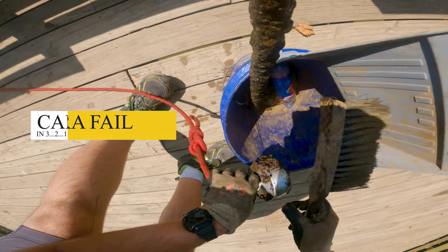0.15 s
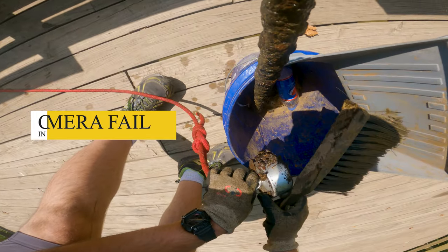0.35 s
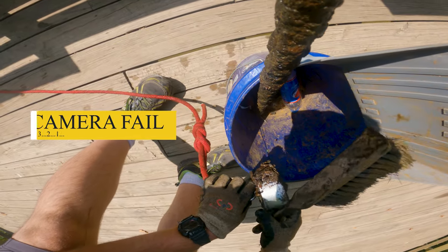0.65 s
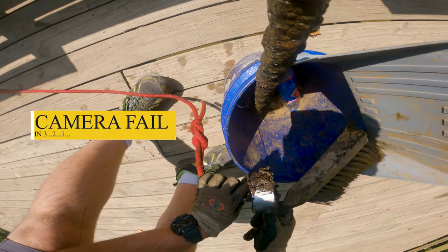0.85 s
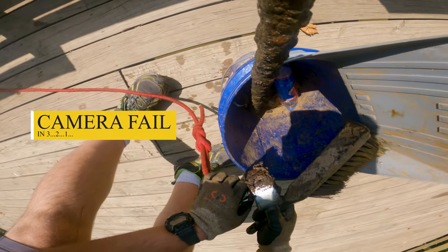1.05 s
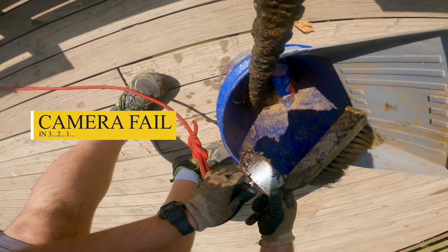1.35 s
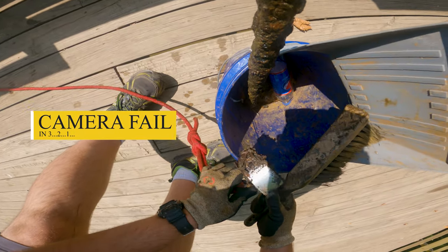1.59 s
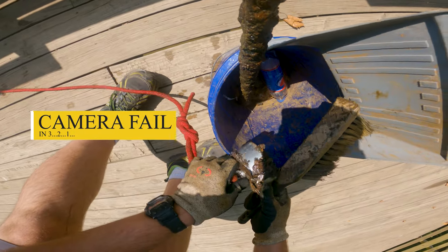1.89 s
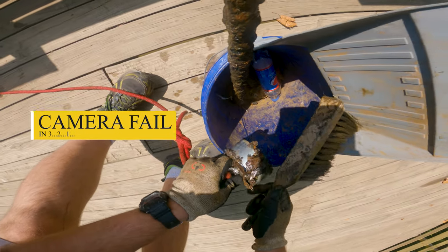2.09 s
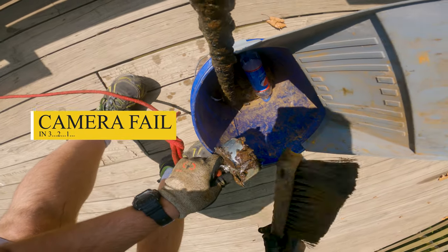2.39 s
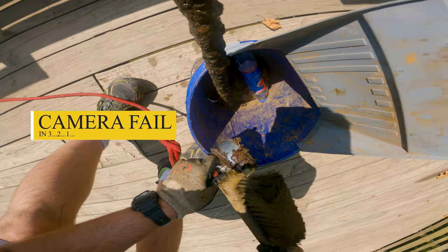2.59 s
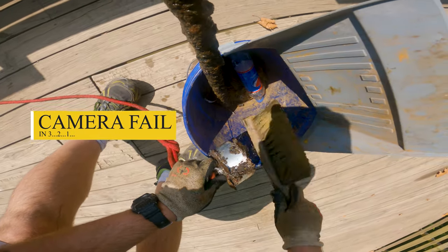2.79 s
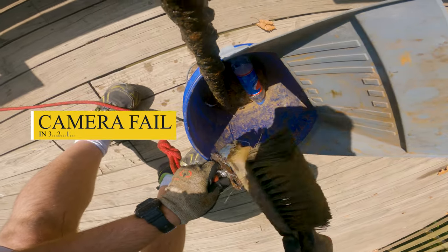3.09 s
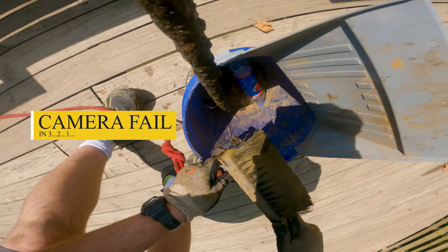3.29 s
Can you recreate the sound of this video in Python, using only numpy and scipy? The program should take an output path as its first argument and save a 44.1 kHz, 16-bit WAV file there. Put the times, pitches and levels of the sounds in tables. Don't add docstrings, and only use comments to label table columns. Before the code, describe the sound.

A stiff brush scrapes and knocks on rusty metal outdoors amid a steady insect chorus.

```python
import sys
import numpy as np
from scipy import signal
from scipy.fft import rfft, irfft
from scipy.io import wavfile
from scipy.ndimage import map_coordinates

SR = 44100
rng = np.random.default_rng(int(sys.argv[2]) if len(sys.argv) > 2 else 0)


def inscribe(sig):
    pcm = np.round(np.clip(np.atleast_2d(sig).T, -1, 1) * 32767)
    wavfile.write(sys.argv[1], SR, pcm.astype(np.int16))


def amplitude_ratio(level_db):
    exponent = np.asarray(level_db, float) / 20
    return 10 ** exponent


N = 152145


def at_hz(points, hz):
    table = np.array(points)
    return np.interp(np.log(hz), np.log(table[:, 0]), table[:, 1])


def in_time(rows):
    return np.interp(np.arange(N) / SR, *np.transpose(rows))


def rms_one(x):
    return x / np.sqrt(np.mean(x ** 2) + 1e-20)


def drift(rate):
    knots = rng.standard_normal(400)
    return map_coordinates(knots, [np.arange(N) / SR * rate * 2], order=3, mode="wrap")


def hump(start, length, rise):
    corners = [start, start + rise * length, start + length]
    return np.sin(np.pi / 2 * np.interp(np.arange(N) / SR, corners, [0, 1, 0]))


def colour(x, spectrum):
    hz = np.maximum(np.arange(N // 2 + 1) * SR / N, 1)
    inside = (hz > spectrum[0][0]) & (hz < spectrum[-1][0])
    return irfft(rfft(x) * amplitude_ratio(at_hz(spectrum, hz)) * inside, N)


def resonance(x, hz, width_hz):
    r = np.exp(-np.pi * width_hz / SR)
    zeros = np.array([1, 0, -1]) * (1 - r * r) / 2
    poles = [1, -2 * r * np.cos(2 * np.pi * hz / SR), r * r]
    return signal.lfilter(zeros, poles, x + 1e-18)


def grains(per_s, uneven_db):
    sizes = amplitude_ratio(uneven_db * np.minimum(rng.exponential(1, N), 5)) * rng.choice([-1, 1], N)
    return rms_one(sizes * (rng.random(N) < per_s / SR))


def widen(mid, other, side_db):
    # hz, level_db
    likeness = [(40, -50), (150, -25), (380, -13.5), (950, -10.5), (2380, -5), (5980, -10), (8000, -4),
                (10000, -13), (12200, -1.5)]
    side_spectrum = [(1, likeness[0][1])] + list(likeness) + [(SR, likeness[-1][1])]
    side = colour(other, side_spectrum) * amplitude_ratio(side_db)
    return np.array([mid + side, mid - side])


def bed(spectrum, patchy_db, rate, count):
    white = rng.standard_normal((2, N))
    full = rfft(widen(colour(white[0], spectrum), colour(white[1], spectrum), 0))
    hz = np.maximum(np.arange(N // 2 + 1) * SR / N, 1)
    low_hz, high_hz = spectrum[0][0], spectrum[-1][0]
    place = np.log(hz / low_hz) / np.log(high_hz / low_hz) * count
    out, together = 0, drift(rate / 4)
    for k in range(count + 1):
        band = irfft(full * np.clip(1 - abs(place - k), 0, 1), N)
        out = out + band * amplitude_ratio(patchy_db * (drift(rate) + .5 * together))
    return rms_one(out)


def body(x, factor, tilt_db):
    # hz, width_hz, level_db
    modes = [(565, 61, -7), (778, 140, -8), (1082, 99, 4), (1376, 85, -4), (1549, 75, 0.5), (2380, 250, -5),
             (2880, 200, -7.5)]
    rung = 0
    for k, (hz, width_hz, db) in enumerate(modes):
        gain = amplitude_ratio(db + tilt_db * abs(np.log2(hz / 1110)))
        rung = rung + (-1) ** k * gain * resonance(x, hz * factor, width_hz)
    wood = signal.butter(4, 2425, fs=SR, output="sos")
    return signal.sosfilt(wood, rung)


def rubs():
    # start_s, length_s, level_db, pitch_factor of the body, db per octave away from 1110 Hz (alike on
    strokes = [(0.033, 0.18, -31, 0.99, -4.5), (0.154, 0.054, -24, 1.03, -3),
               (0.202, 0.037, -22.5, 1.055, -7), (0.234, 0.034, -26.5, 1.1, -2),
               (0.25, 0.17, -35.5, 1.03, 2), (0.439, 0.14, -32.5, 1.03, 3.5),
               (0.543, 0.037, -29.5, 0.98, 2), (0.579, 0.034, -30.5, 0.93, 2.5),
               (0.7, 0.063, -35.5, 1.11, 9.5), (0.742, 0.086, -30, 0.9, 0), (0.825, 0.19, -39.5, 1.12, 4),
               (1.09, 0.05, -33, 1.2, 2), (1.65, 0.22, -28.5, .88, 1), (1.762, 0.075, -22.5, 1.033, 6),
               (1.8, 0.053, -24, 0.97, -3), (1.833, 0.037, -19, 0.9, -2), (1.856, 0.036, -28.5, 0.78, 1),
               (2.79, 0.17, -37.5, 1.1, 6.5), (2.926, 0.039, -23, 0.89, 1.5),
               (2.971, 0.063, -21.5, 1.05, -5.5), (3.336, 0.022, -31.5, 1.06, 7),
               (3.425, 0.1, -22, 0.95, 1.5)]
    slips = grains(per_s=2500, uneven_db=1) * amplitude_ratio(1.5 * drift(60))
    out = np.zeros(N)
    for start, length, db, factor, tilt_db in strokes:
        a, b = int(start * SR), min(N, int((start + length + .1) * SR))
        stroke = (slips * hump(start, length, rise=0.29))[a:b]
        out[a:b] += amplitude_ratio(db + 14.5) * body(stroke, factor, tilt_db)
    return out


def knocks():
    # start_s, peak_db, ring_hz, crack_db against the ring, rattle_s
    contacts = [(.176, -19, 1160, -30, .01), (.213, -19, 1160, -30, .008), (.24, -20, 1130, -30, .006),
                (.51, -25, 1150, -14, .004), (.555, -27, 1100, -10, .003),
                (0.818, -11.5, 1650, -15, 0.0082), (0.853, -22, 1150, -20, .004),
                (0.927, -22.5, 970, -10, 0.0033), (1.096, -18.5, 1080, -20, 0.0083),
                (1.11, -24, 1400, -14, 0.0044), (1.6588, -16, 2500, -10, .005),
                (1.81, -15, 1010, -20, 0.0046), (1.843, -15, 830, -24, 0.0025),
                (1.8505, -16, 960, -14, .002), (2.052, -26, 1080, -14, .002),
                (2.787, -12.5, 1500, -5, 0.0022), (2.803, -22, 1710, 2, .002),
                (2.850, -26.5, 890, 4, 0.0016), (2.899, -18, 3360, -15, 0.0014),
                (2.9652, -8, 715, -11, 0.0052), (2.967, -15, 2360, -22, 0.0018),
                (2.969, -12, 580, -12, 0.0043), (2.978, -14, 890, -10, .002),
                (2.988, -11.5, 1250, -29, 0.0043), (3.002, -20.5, 1380, -20, 0.006),
                (3.2495, -23.5, 1700, 0, 0.0022), (3.331, -16.5, 1300, 9, .001),
                (3.335, -27, 1320, -6, .002), (3.345, -23, 1290, -18, 0.0036),
                (3.37, -23, 1870, -10, 0.0027)]
    # hz, level_db
    crack_spectrum = [(500, 3), (1500, 17), (5000, 6.5), (7500, -1), (12500, -40), (14500, -50)]
    ring_t60_s, rise_s, crack_share = 0.047, 0.00051, 0.44
    out, cracks = np.zeros(N + SR), np.zeros(N + SR)
    t = np.arange(SR // 8) / SR
    rise = 1 - np.exp(-t / rise_s)
    for s, db, hz, crack_db, rattle_s in contacts:
        noise = rng.standard_normal((2, len(t)))
        i = int(s * SR)
        rattle = noise[0] * np.exp(-t / rattle_s) * rise
        own_ring = resonance(resonance(rattle, hz, 1500), hz, 7 / ring_t60_s)
        ring = own_ring + amplitude_ratio(-5) * body(rattle, 0.906, 0)
        out[i:i + len(t)] += amplitude_ratio(db) * ring / abs(ring).max()
        crack = noise[1] * np.exp(-t / (crack_share * rattle_s)) * rise
        cracks[i:i + len(t)] += amplitude_ratio(db + crack_db) * crack
    return out[:N] + colour(cracks[:N], crack_spectrum)


def thumps():
    # start_s, peak_db, pitch_hz, t60_s
    pushes = [(0.128, -20.5, 107, .06), (0.273, -20, 124, 0.12), (0.828, -17.5, 152, 0.044),
              (1.665, -19.5, 121, .06), (1.78, -22, 264, 0.058), (1.839, -10.5, 158, 0.034),
              (1.857, -16.5, 132.5, 0.081), (1.876, -19.5, 146, 0.086), (.76, -25, 250, .05),
              (2.787, -24, 270, 0.031), (2.801, -17.5, 160, 0.038), (2.825, -20, 131, 0.093),
              (2.849, -23, 257, 0.065), (2.905, -21, 216, 0.035), (2.9722, -5, 142, 0.048),
              (2.989, -16.5, 180, 0.083), (3.016, -16.5, 179, 0.061), (3.335, -18.5, 235, 0.065),
              (3.435, -21.5, 277, .05)]
    out, t = np.zeros(N + SR), np.arange(SR // 4) / SR
    for s, db, hz, t60 in pushes:
        i = int(s * SR)
        wave = -np.sin(2 * np.pi * hz * t) - 0.33 * np.sin(2 * np.pi * 1.54 * hz * t)
        out[i:i + len(t)] += amplitude_ratio(db - 0.5 - 60 * t / t60) * wave
    return out[:N]


def flicks():
    # start_s, length_s, level_db at 9 kHz, tilt_db (the grit below 7 kHz sits 2 * tilt_db + 10 dB under
    bristle_flicks = [(0.542, 0.034, -45.5, -4.5), (0.573, 0.021, -40, 0), (.59, .035, -47, 1),
                      (0.507, .015, -50, 0), (0.656, 0.014, -46, -2), (0.73, 0.02, -46.5, -5.5),
                      (0.754, 0.015, -41, -3), (0.765, 0.02, -41, -5.5), (0.815, 0.011, -40.5, -8),
                      (.851, .012, -44, 2), (1.212, .008, -44.5, -7), (1.657, 0.013, -44.5, -11),
                      (1.678, 0.07, -53, -10), (1.747, 0.019, -50, -10.5), (1.758, 0.1, -44.5, -7),
                      (1.848, .045, -46, -2), (2.054, 0.0086, -48, -2), (2.781, .013, -39, 2),
                      (2.797, 0.016, -43, -2), (2.813, 0.015, -44, -5), (2.827, 0.05, -39.5, -4),
                      (2.87, 0.034, -33, 0.5), (2.893, 0.029, -33, 0), (2.916, 0.044, -47, 2),
                      (3.247, 0.0095, -41, -7), (3.334, 0.0054, -38, 8), (3.368, 0.012, -45, -5.5),
                      (3.437, .04, -43, 1)]
    # hz, level_db
    grit_spectrum = [(1500, 0), (4000, 9), (9000, -2.5), (12500, -10.5), (14000, -18), (15200, -38)]
    grit = colour(grains(per_s=14000, uneven_db=3.5), grit_spectrum) * amplitude_ratio(1.2 * drift(120))
    dull = signal.sosfiltfilt(signal.butter(2, 7000, fs=SR, output="sos"), grit)
    bright = grit - dull
    out = np.zeros(N)
    for s, length, db, tilt_db in bristle_flicks:
        tilted = bright + amplitude_ratio(-2 * tilt_db - 10) * dull
        out += amplitude_ratio(db) * hump(s, length, rise=.25) * tilted
    return amplitude_ratio(11.5) * out


def squeal():
    # start_s, length_s, level_db, pitch_hz, width_hz
    start, length, db, hz, width_hz = (2.833, .046, -20, 5300, 1700)
    slips = grains(per_s=7000, uneven_db=2)
    tone = rms_one(resonance(resonance(slips, hz, width_hz), hz, width_hz))
    return tone * amplitude_ratio(db) * hump(start, length, rise=.6)


def insects():
    # hz, db_per_hz
    chorus_spectrum = [(2200, -26.5), (2920, -8), (3600, -3), (4500, -2.5), (4900, 3), (5500, 1),
                       (6200, -1.5), (7800, -13.5), (8300, -28)]
    # time_s, level_db
    chorus_swell = [(0, -2.5), (1.8, -2), (2.75, -0.5), (3.05, -4), (3.45, -2)]
    pan_db = np.array([[0.7], [-0.7]])
    level = amplitude_ratio(-28.5 + in_time(chorus_swell) + pan_db)
    return level * bed(chorus_spectrum, patchy_db=1.2, rate=17, count=9)


def rumble():
    # hz, db_per_hz
    rumble_spectrum = [(12, 0), (27, -5.5), (80, -2.5), (173, -11), (225, -19), (450, -30.5)]
    # time_s, level_db
    gusts = [(0, 2), (1, -1), (1.5, 0.5), (2, 0), (3.0, -1.5), (3.45, -2)]
    return amplitude_ratio(-31.5 + in_time(gusts)) * bed(rumble_spectrum, patchy_db=1.36, rate=5.6, count=4)


def air():
    # hz, db_per_hz
    air_spectrum = [(200, -5), (323, -5), (510, -2.5), (700, -7.5), (980, -2.5), (1500, -9.5),
                    (2250, -13.5), (3600, -13.5)]
    # time_s, level_db
    bustle = [(0, 0.5), (.12, 2.5), (.2, 6.5), (.3, 1), (.58, 2.7), (.64, 0), (.72, 1), (.95, 1), (1.15, 1),
              (1.35, -2.5), (1.55, 2.5), (1.9, -1.5), (2.1, -2.5), (2.4, 0.5), (2.7, -1), (3.45, -1)]
    # hz, db_per_hz
    hiss_spectrum = [(6500, -7.5), (8200, 0.5), (10800, -8.5), (12200, -8), (13600, -16.5), (15700, -34)]
    middle = amplitude_ratio(-37 + in_time(bustle)) * bed(air_spectrum, patchy_db=.8, rate=9.7, count=7)
    hiss = amplitude_ratio(-53) * bed(hiss_spectrum, patchy_db=1.0, rate=18, count=3)
    return middle + hiss


def bird():
    # start_s, length_s, level_db, pitch_hz
    whistles = [
        (.975, .055, -38, 4320),
        (1.005, .085, -34, 4025),
        (.17, .1, -35, 4740),
    ]
    out, t = np.zeros(N), np.arange(N) / SR
    for s, length, db, hz in whistles:
        out += amplitude_ratio(db) * hump(s, length, rise=0.42) * np.sin(2 * np.pi * hz * t)
    return out


def whine():
    # start_s, length_s, level_db, pitch_hz, width_hz
    swells = [
        (2.19, 0.49, -44.5, 1837, 180),
        (3.02, 0.6, -43, 1830, 160),
        (1.92, 0.85, -47.5, 970, 59),
        (1.47, 0.39, -42.5, 2030, 400),
    ]
    out = 0
    for s, length, db, hz, width_hz in swells:
        narrow = resonance(resonance(rng.standard_normal((2, N)), hz, width_hz), hz, width_hz)
        stereo = rms_one(narrow[0]) + 0.11 * rms_one(narrow[1]) * np.array([[1], [-1]])
        throb = amplitude_ratio(db + 4 * drift(12))
        out = out + throb * np.sqrt(hump(s, length, rise=0.3)) * stereo
    return out


def scene():
    near = rubs() + knocks() + thumps() + flicks() + squeal()
    pan_db = np.array([[-0.3], [0.3]])
    close = widen(near, np.roll(near, 131), side_db=-3) * amplitude_ratio(pan_db)
    around = insects() + rumble() + air()
    return close + around + bird() + whine()


def top_cut(x):
    return signal.sosfilt(signal.butter(12, 15740, fs=SR, output="sos"), x)


def record(dry):
    mix = 0.89 * np.tanh(dry / 0.9)
    return top_cut(mix)


dry = scene()
out = record(dry)
inscribe(out)
```